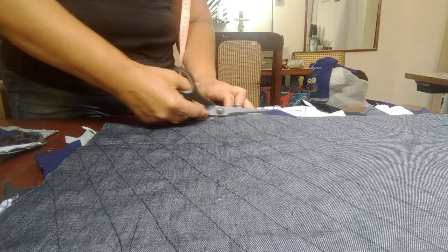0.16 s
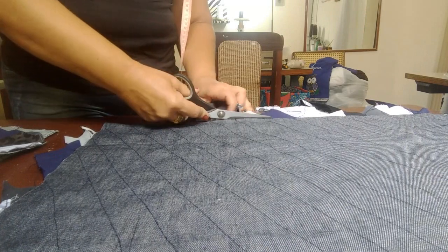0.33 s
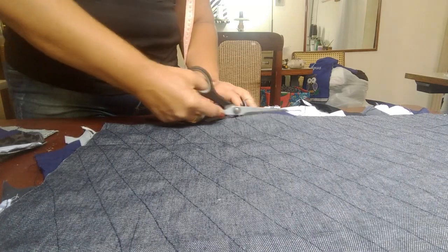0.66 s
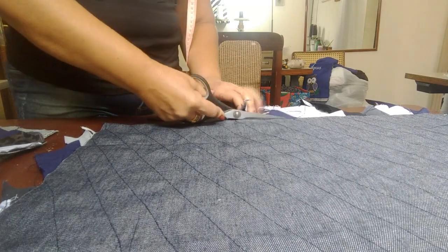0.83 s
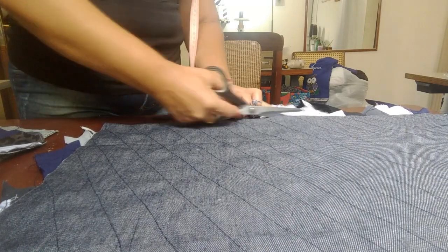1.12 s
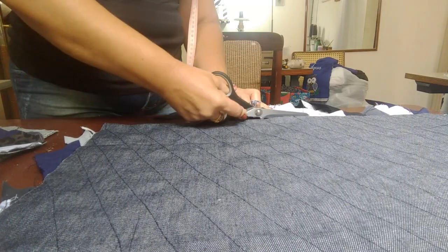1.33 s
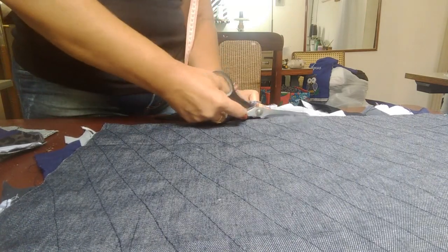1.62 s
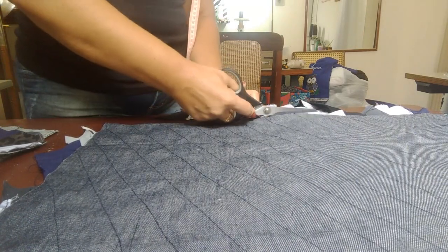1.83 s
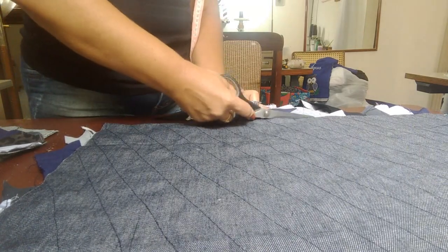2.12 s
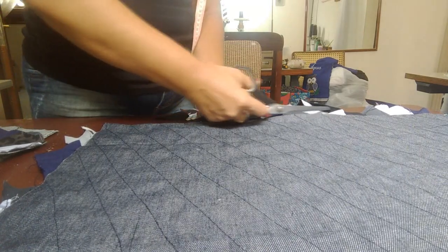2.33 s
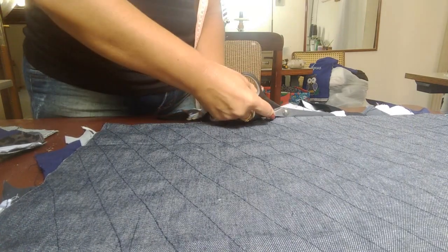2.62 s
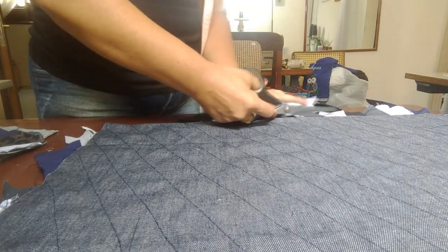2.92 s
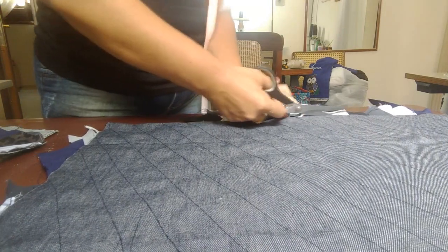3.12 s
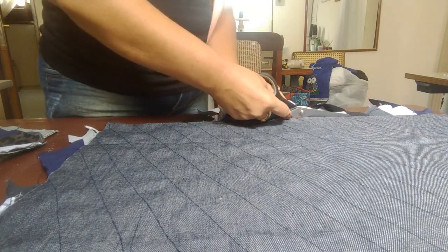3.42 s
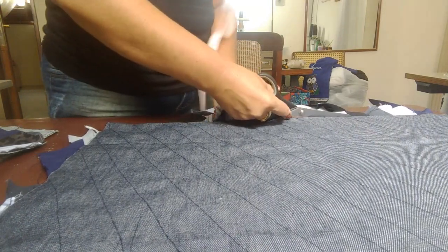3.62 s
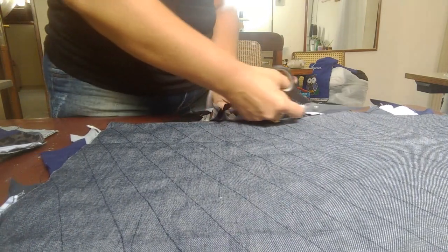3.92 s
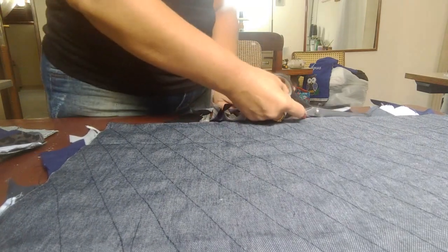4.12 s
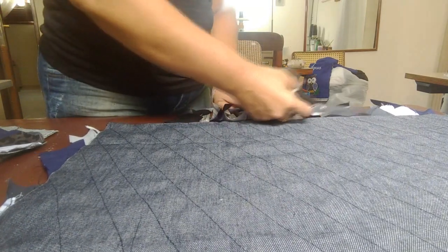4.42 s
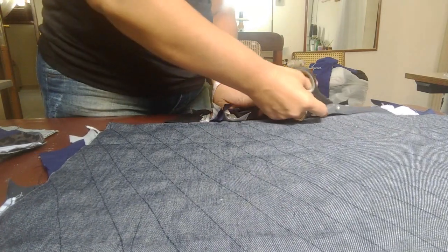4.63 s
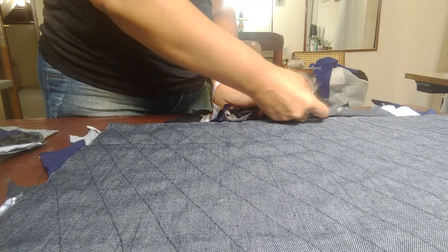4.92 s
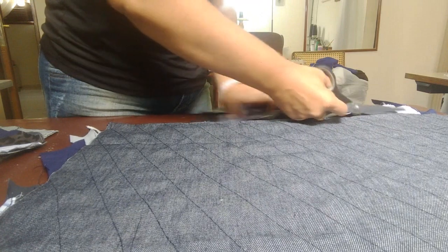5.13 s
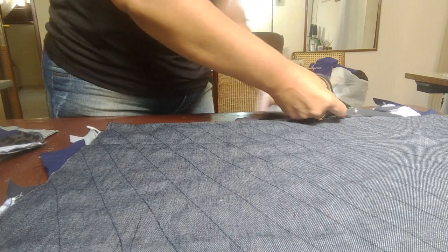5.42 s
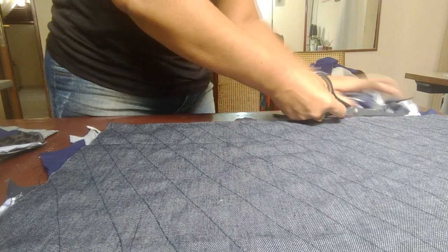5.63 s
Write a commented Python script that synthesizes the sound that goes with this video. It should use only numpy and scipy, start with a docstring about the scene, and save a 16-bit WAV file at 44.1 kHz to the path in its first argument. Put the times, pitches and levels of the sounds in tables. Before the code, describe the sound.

Close, uneven scissor cuts crunch through heavy cloth, the blades sliding open and knocking shut against a wooden tabletop indoors.

```python
"""Scissor blades slide open over a soft rustle of denim, then snip through it on a wooden table.
Each stroke snaps threads, scrapes steel on steel and shakes the table top; blades and handles knock,
the table thumps and a hand brushes the cloth. A furnished room adds a short echo and a low room tone.
A camera on the same table widens the stereo by taking a late copy of each microphone port off the other."""
import sys
import numpy as np
from scipy import signal
from scipy.fft import rfft, irfft, next_fast_len
from scipy.io import wavfile
from scipy.ndimage import map_coordinates

SR = 44100
rng = np.random.default_rng(int(sys.argv[2]) if len(sys.argv) > 2 else 0)


def waveform_to_disk(signal):
    """Save audio, clipped to [-1, 1], as 16-bit WAV at the path in sys.argv[1]."""
    frames = np.transpose(np.atleast_2d(signal))
    scaled = np.clip(frames, -1, 1) * 32767
    samples = np.round(scaled).astype(np.int16)
    wavfile.write(sys.argv[1], SR, samples)


N = 254016


def amp(db):
    """dB to gain."""
    return 10 ** (np.asarray(db) / 20)


def unit(x):
    """x at rms 1."""
    return x / np.sqrt(np.mean(x ** 2) + 1e-20)


def along(points, hz):
    """Read a curve of (f/Hz, value) points on a log axis."""
    f, values = np.transpose(points)
    return np.interp(np.log(hz + 1), np.log(f + 1), values)


def wobble(per_s):
    """A smooth random curve with per_s knots a second."""
    return map_coordinates(rng.standard_normal(int(N * per_s / SR) + 4), [np.arange(N) * per_s / SR])


def filtered(x, response, normalise=False):
    """x through a complex frequency response; normalised, white noise keeps its level."""
    size = next_fast_len(N + SR // 2)
    gain = response(np.fft.rfftfreq(size, 1 / SR))
    if normalise:
        gain = gain / np.sqrt(np.mean(np.abs(gain) ** 2))
    return irfft(rfft(x, size) * gain, size)[..., :N]


def colour(x, curve):
    """Give x the tone of a smooth EQ curve."""
    return filtered(x, lambda hz: amp(along(curve, hz)), normalise=True)


def ring(x, modes, passes=1):
    """Ring a body's resonances with x; a second pass narrows them."""
    def body(hz):
        return sum((-1) ** k * amp(db) * 1j * hz * width / (centre ** 2 - hz ** 2 + 1j * hz * width)
                   for k, (centre, width, db) in enumerate(modes))
    return filtered(x, lambda hz: body(hz) ** passes, normalise=True)


# Likeness of the two microphone ports: f/Hz, correlation
PORT_LIKENESS = [(60, -0.65), (200, 0.61), (500, 0.71), (1000, 0.58), (2000, -0.22), (4000, 0.15),
                 (8000, 0.067), (13000, 0.16)]
def stereo_noise():
    """White noise, as alike left and right as the ports hear it."""
    def mid_side(hz):
        angle = np.arccos(along(PORT_LIKENESS, hz)) / 2
        return np.array([np.cos(angle), np.sin(angle)])
    mid, side = filtered(rng.standard_normal((2, N)), mid_side)
    return np.array([mid + side, mid - side])


# Fader ride of the rustle: t/s, level/dB
RUSTLE_RIDE = [(0.0, -51.5), (1.17, -54), (1.43, -58.5), (1.97, -53.5), (2.5, -64), (2.65, -54),
               (3.74, -51), (4.03, -53.5), (4.49, -56.5), (5.258, -49.5), (5.76, -54.5)]
# Tone of the denim: f/Hz, level/dB
DENIM_EQ = [(300, -28.5), (1200, 11), (2800, 11), (4000, 10.5), (6500, 10), (9500, 3.5), (12000, 9),
            (14200, 1), (14700, -51)]
def rustle():
    """Cloth shifts under the hands with a fluttering hiss."""
    times, db = np.transpose(RUSTLE_RIDE)
    ride_db = np.interp(np.arange(N) / SR, times, db) + 1.34 * wobble(59)
    return amp(ride_db) * colour(stereo_noise(), DENIM_EQ)


# Tone of the room's air: f/Hz, level/dB
AIR_EQ = [(25, -28), (50, -12), (90, 12), (130, 1.5), (210, 12.5), (300, 6.5), (450, 0.5), (900, -5),
          (2000, -21), (6000, -17.5), (14200, -19), (14700, -60)]
def room_tone():
    """A low, nearly steady bed of air."""
    return amp(-52 + 0.17 * wobble(28)) * colour(stereo_noise(), AIR_EQ)


# Every contact feeds six paths: handles, legs, table top, blades, tips, threads.
# Weight on the table, per path: gain/dB for each dB
WEIGHT_SENDS = [0.13, 0.58, 0.54, 0.4, 0.27, 0.26]
# Bite of the steel, per path: gain/dB for each dB
BITE_SENDS = [0.19, 0.18, 0.34, 0.76, 0.61, 1.61]
# Contact at the tips (place +1), reversed at the pivot (place -1), per path: gain/dB
PLACE_SENDS = [4, 14.5, -2, -2, 14, 4]
def sends(db, spread_db, weight_db=0, bite_db=0, place=0):
    """Gain of one contact on each of the six paths."""
    pressure_db = weight_db * np.array(WEIGHT_SENDS) + bite_db * np.array(BITE_SENDS)
    return amp(db + np.array(spread_db) + pressure_db + place * np.array(PLACE_SENDS))


def stroke(start_s, gains, rise_ms, hold_ms, sag_db_per_ms=0, release_ms=55):
    """Start and force of one rub on the six paths; steel scrapes at once, the wood is loaded later."""
    ms = np.arange(SR // 4) / SR * 1000
    swell = np.clip(ms / max(rise_ms, 1), 0, 1) ** np.array([[1.5], [1.8], [1.8], [1.1], [1.1], [1.1]])
    fade_db = -60 * np.clip(ms - rise_ms - hold_ms, 0, None) / release_ms - sag_db_per_ms * ms
    return start_s, gains[:, None] * swell * amp(fade_db)


# Opening slides: t/s, hold/ms, level/dB, weight/dB, bite/dB
OPENING_CUES = [(0.0, 33, -39, 1.5, 1), (0.529, 46, -39, 1, -3.5), (1.008, 55, -31.5, -13.5, -1.5),
                (1.683, 42, -40, -1.5, 0), (1.847, 12, -53, 13, -3), (2.195, 41, -43.5, -6.5, 0.5),
                (2.904, 49, -36.5, -5, -4), (3.796, 30.6, -37.5, -5.5, 5), (4.409, 45, -34, 0, -2),
                (4.963, 38, -31, -7, -1), (5.719, 38, -33.5, -13, -4)]
# Mix of a slide, per path: level/dB
OPENING_MIX = [1.5, -1.5, 0, -8, -21, -15.5]
def openings():
    """The blades slide open along the table, pressing less as they part."""
    return [stroke(s, sends(db, OPENING_MIX, *press), rise_ms=5.2, hold_ms=hold, sag_db_per_ms=0.076)
            for s, hold, db, *press in OPENING_CUES]


# Pushes on the table top: t/s, level/dB, push/ms
THUMP_CUES = [(0.162, -23.5, 0.69), (0.3, -20, 0.58), (0.801, -10, 1.3), (0.865, -9, 1.1),
              (1.036, -22, 0.9), (1.102, -21, 0.49), (2.028, -5.5, 0.49), (2.502, -14, 4),
              (2.666, -27, 0.69), (2.721, -1, 0.26), (4.064, -8.5, 1.5), (4.2, -2, 1.43), (4.249, -13, 3.4),
              (4.33, -8, 3.8), (4.779, -6.5, 1.26), (5.368, -6, 0.52)]
# Deepest ring of the table: f/Hz, width/Hz, level/dB
FRAME_MODES = [(126.7, 16.9, 0), (155, 3.6, -6), (58.4, 9.8, -10)]
def thumps(rebound_ratio=2.9):
    """The lower blade or the hand pushes the table, which rebounds more slowly; longer is deeper."""
    force, ms = np.zeros(N), np.arange(SR // 15) / SR * 1000
    bump = lambda length: ms / length ** 2 * np.exp(1 - ms / length)
    for s, db, push_ms in THUMP_CUES:
        force[round(s * SR):][:len(ms)] += amp(db - 30) * (bump(push_ms) - bump(rebound_ratio * push_ms))
    return ring(force, FRAME_MODES) * amp([[0], [-4]])  # leans left


# Snips: t/s, rise/ms, hold/ms, level/dB, weight/dB, bite/dB, place
CUT_CUES = [(0.257, 22, 93, -31.5, 3, 0, -0.057), (0.733, 7.6, 32, -45.5, 16.5, -8.5, 0.1),
            (0.785, 1.1, 72.2, -22, -9.5, -2, -0.21), (0.878, 3.3, 26, -33, -18, -4.5, -0.019),
            (1.262, 37.7, 23.4, -33.5, 15.5, -19, -0.019), (1.934, 35.6, 61, -27.5, 2, -9, 0.21),
            (2.479, 23.4, 42, -39.5, 3.5, -3.5, 0.15), (2.611, 0.77, 2.1, -25.5, -18, -3.5, 0.24),
            (2.658, 2.1, 15.5, -36, -21, 5.5, 0.052), (3.326, 19, 92, -42.5, 14, -9.5, -0.035),
            (3.389, 4.5, 44, -25.5, -14, 2, 0.06), (3.898, 2, 53, -49, -17, 19, -0.087),
            (4.059, 7.9, 46, -33, -16, -3, 0.12), (4.126, 15.7, 59, -26.5, 0.5, -3, 0.13),
            (4.239, 3.5, 16, -37.5, 5, -10, 0.31), (4.685, 8.7, 21, -39, 1.5, -8, 0.22),
            (4.724, 5.3, 81, -29, -10.5, 2, 0.35), (5.186, 6.7, 88, -35.5, -5, 2, 0.32),
            (5.3, 23, 40, -39, -4, 4.5, 0.14), (5.421, 3, 5.3, -41, 14.5, 3, 0.25),
            (5.683, 2.4, 54, -48.5, 14.5, -12, -0.031)]
# Mix of a snip, per path: level/dB
CUT_MIX = [-5, -1, -0.5, -6, -6, -8.5]
def cuts():
    """The blades close through the cloth."""
    return [stroke(s, sends(db, CUT_MIX, *press), rise, hold) for s, rise, hold, db, *press in CUT_CUES]


# Blades shutting, handles and tips knocking: t/s, level/dB, weight/dB, bite/dB, place
KNOCK_CUES = [(0.791, -25.5, 25, -1, -0.5), (0.809, -18.5, 0, -3, -0.015), (0.832, -4, -12, 0.5, -0.68),
              (0.851, -22.5, 4.5, -21.5, 0.65), (1.313, -23.5, -15, 7.5, -1),
              (1.971, -23.5, -10, 12.5, -0.8), (1.985, -13.5, -1, -1, -0.12),
              (2.003, -15.5, 18, -25, -0.12), (2.022, -28.5, 6, 19.5, -0.13),
              (2.027, -3.5, -9, 10.5, -0.42), (2.615, -20.5, 4, -18, -2.3), (2.664, -29, 0, 0, -0.89),
              (2.719, -7, 3, 5.5, -0.57), (3.399, -4.5, 17, -33.5, -1.12), (3.445, -18.5, 4, -11, -0.04),
              (3.708, -31, 9, -44, 0.69), (3.905, -34, -6.5, 16, 0.47), (4.059, -22, 7.5, -7, -0.81),
              (4.147, -37, 10, -6, 0.078), (4.168, -9, -4, -5, -0.026), (4.173, 1.5, -9.5, -6, -0.73),
              (4.22, -38, 14, 16, 0.34), (4.249, -24, -2, -15, 0.23), (4.739, -18.5, -7, 1, -0.58),
              (4.79, -30, -2, 14.5, -0.39), (4.772, -11, -12.5, 10, 0.18), (5.325, -21, -20, -1, -0.78),
              (5.342, -3.5, -14, -2.5, -0.47), (5.357, -9, 4, -24, -0.99), (5.366, -14.5, 5.5, 9.5, 0.29),
              (5.429, -32, 0.5, 9, 0.67), (5.441, -19.5, 3, -19, 0.14), (5.686, -40.5, 35, -30, 0.016)]
# Mix of a knock, per path: level/dB
KNOCK_MIX = [-8, -10, -13.5, -11, -5.5, -20.5]
def knocks(push_ms=0.1, crack_ms=1.7, lead_ms=7):
    """One smooth push on the wood, then a short, rough steel crack with a softened onset."""
    blows, grit = np.zeros((6, 2, N + SR)), stereo_noise()
    ms = np.arange(SR // 50) / SR * 1000 - lead_ms
    push_age = np.clip(ms + 2, 0, None) / push_ms  # starts 2 ms ahead of the cue
    push_shape = push_age * np.exp(1 - push_age)
    crack_shape = np.exp(-np.abs(ms - 1) / crack_ms)
    for s, db, *press in KNOCK_CUES:
        start = round((s - lead_ms / 1000) * SR)
        span = slice(start, start + len(ms))
        push = rng.choice([-1, 1]) * push_shape * amp(rng.normal(0, 1.5, (3, 2, 1)))
        crack = [crack_shape * grit[:, span]] * 3
        blows[..., span] += sends(db, KNOCK_MIX, *press)[:, None, None] * np.concatenate([push, crack])
    return blows[..., :N]


# Mix of the chatter, per path: level/dB added to the knock's cue level
SHUDDER_MIX = [-41, -25, -59, -71, -46, -84]
def shudders():
    """The shears chatter faintly after each knock."""
    return [stroke(s, sends(db, SHUDDER_MIX, *press), rise_ms=4.8, hold_ms=61)
            for s, db, *press in KNOCK_CUES]


# Hand sweeps: t/s, hold/ms, level/dB
BRUSH_CUES = [(1.07, 174, -68), (3.239, 56, -65), (3.6, 54, -63)]
# Mix of a sweep, per path: level/dB
BRUSH_MIX = [0, 9, 5.5, 0.5, 9, 11.5]
def brushes():
    """A hand brushes softly over the cloth."""
    return [stroke(s, sends(db, BRUSH_MIX), rise_ms=19, hold_ms=hold) for s, hold, db in BRUSH_CUES]


def slips(per_s=220, decay_ms=1.1):
    """The edge catches at random moments, each catch dying quickly."""
    catches = (rng.random(N) < per_s / SR) * amp(rng.normal(0, 4.5, N))
    return unit(signal.lfilter([1], [1, -np.exp(-1000 / (decay_ms * SR))], catches))


def friction(strokes):
    """Rubbing noise on the six paths; threads part one by one, so the force is lumpy."""
    power = np.zeros((6, N + SR))
    for s, force in strokes:
        power[:, round(s * SR):][:, :force.shape[1]] += force ** 2
    snaps_db = 1.5 * wobble(300) + 1.2 * wobble(80) + 1.6 * np.array([wobble(110) for _ in range(6)])
    snaps_db[3:] += 1.5 * wobble(500) + 2.2 * wobble(120)  # single threads and bundles
    slip_share = np.array([[0.52], [0.31], [0.26], [0.1], [0.15], [0.16]])
    grain = amp(snaps_db) * (1 - slip_share + slip_share * slips())
    return np.array([np.sqrt(power[path, :N]) * unit(grain[path]) * stereo_noise() for path in range(6)])


# Tone of snapping threads: f/Hz, level/dB
THREAD_EQ = [(4000, -2.5), (7000, 1), (7800, 0), (9500, 2.5), (10800, -1), (12000, 8.5), (13400, -3.5),
             (14300, 1), (14800, -22.5), (16000, -44)]
# Ringing bodies: f/Hz, width/Hz, level/dB
LEG_MODES = [(230, 35, 2), (248.9, 20, 5), (309.6, 27.6, 4.5)]  # rails and legs
TOP_MODES = [(355.5, 51, -2.5), (419, 56, 4), (500.4, 133, 2), (605, 187, -2)]  # table top
HANDLE_MODES = [(699, 38, 5), (848, 74, 2), (952, 56, 6), (1116, 79, -2.5), (1327, 76, -1.5),
                (1426, 77, -3.5), (1480, 86, -6), (1785, 140, -25)]  # hollow ring of the shears on wood
BLADE_MODES = [(1753, 1030, -2), (2840, 1120, 4.5), (3457, 990, 0.5), (3740, 195, 0.5)]  # low ring of the steel
TIP_MODES = [(3990, 490, 5.5), (4220, 480, 6.5), (4610, 140, 8.5), (5770, 700, 0.5), (5980, 250, 10.5),
             (6390, 430, -3.5), (6860, 160, 4.5)]  # high ring of the steel
def scissors(rubs, blows, grip_shift=0.036, grip_per_s=9, low_cut_hz=43.5):
    """Rubs and blows sound the threads, the wood and the shears, whose ring shifts with the grip."""
    handles, legs, top, blades, tips, threads = range(6)
    sound = colour(rubs[threads] + blows[threads], THREAD_EQ)
    sound += ring(amp(-15) * rubs[legs], FRAME_MODES, passes=2)
    for path, modes in ((legs, LEG_MODES), (top, TOP_MODES)):
        # rubbing sets the wood ringing narrow; a blow starts it at once
        sound += ring(rubs[path], modes, passes=2) + ring(blows[path], modes)
    for path, modes in ((handles, HANDLE_MODES), (blades, BLADE_MODES), (tips, TIP_MODES)):
        grip = np.pi / 4 * (1 + np.tanh(2 * wobble(grip_per_s)))  # crossfades a flat and a sharp tuning
        for fade, pitch in ((np.cos(grip), 1 - grip_shift), (np.sin(grip), 1 + grip_shift)):
            sound += ring(fade * (rubs[path] + blows[path]), np.array(modes) * [pitch, 1, 1])
    # the shears are too light to move the table in the deep bass
    return filtered(sound, lambda hz: (1j * hz / (low_cut_hz + 1j * hz)) ** 3)


# Decay of the furnished room: f/Hz, t60/s
ROOM_DECAY = [(60, 0.6), (130, 0.16), (300, 0.18), (1000, 0.24), (4000, 0.27), (12000, 0.19)]
# Tone of the echo: f/Hz, level/dB
ECHO_EQ = [(60, 10), (250, -4.5), (1000, 0.5), (4000, -6.5), (12000, -3.5)]
def echo(x, predelay_samples=200):
    """A short room echo, drawn afresh every quarter second so no single pitch rings on."""
    wet, step = np.zeros((2, N + SR)), SR // 4
    for start in range(0, N, step):
        hz, t, noise = signal.stft(rng.standard_normal((2, SR * 2 // 5)), SR, nperseg=512)
        decay = amp(-60 * t / along(ROOM_DECAY, hz)[:, None])
        decay *= amp(along(ECHO_EQ, hz))[:, None] / np.linalg.norm(decay, axis=1, keepdims=True)
        tail = signal.istft(noise * decay, SR, nperseg=512)[1] / 16
        answer = signal.fftconvolve(x[:, start:start + step], tail, axes=1)
        wet[:, start + predelay_samples:][:, :answer.shape[1]] += answer
    return wet[:, :N]


# Balance of the ports: f/Hz, left above right/dB
PORT_BALANCE = [(60, -16.5), (125, 6), (250, -0.1), (1000, 1), (2500, -4), (6000, -3), (13000, -5.5)]
def scene():
    """The mix at the two ports; the left one lies in the camera's shadow for treble."""
    rubs = friction(openings() + cuts() + shudders() + brushes())
    snipping = scissors(rubs, knocks())
    mix = snipping + echo(snipping) + thumps() + rustle() + room_tone()
    return filtered(mix, lambda hz: amp(along(PORT_BALANCE, hz) * np.array([[0.5], [-0.5]])))


# Stereo widener: f/Hz, gain of the late copy
CROSSFEED = [(200, 0.036), (700, 1), (1200, 0.68), (2500, 0.73), (3800, 0.6), (6000, 0.15), (9000, 0.3),
             (12000, 0.29), (14000, 0.14)]
# Tone of the microphone: f/Hz, level/dB
MIC_EQ = [(25, -23.5), (60, 0), (14300, -11.5), (14900, -38), (15700, -23)]
def record(dry):
    """Each channel loses a late share of the other port, the right one less; then the band is limited."""
    port_travel_ms, top_hz = 0.4072, 15741
    late = lambda hz: along(CROSSFEED, hz) * np.exp(-2j * np.pi * hz * port_travel_ms / 1000)
    wide = dry - filtered(dry[::-1], late) * [[1], [0.8]]
    return filtered(wide, lambda hz: amp(along(MIC_EQ, hz)) * (hz < top_hz))


dry = scene()
out = record(dry)
waveform_to_disk(out)
```